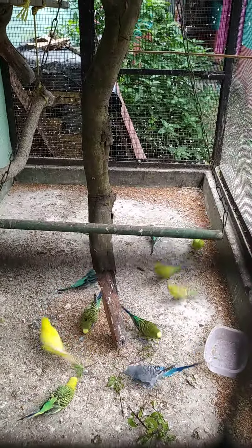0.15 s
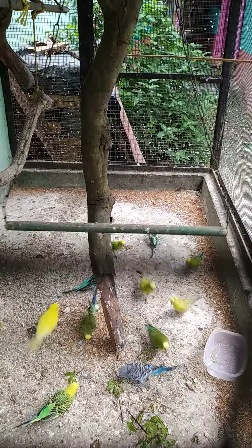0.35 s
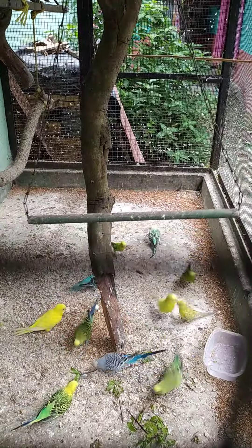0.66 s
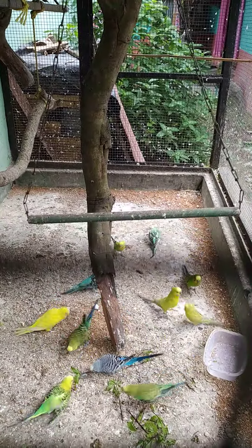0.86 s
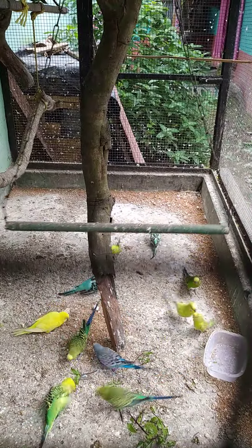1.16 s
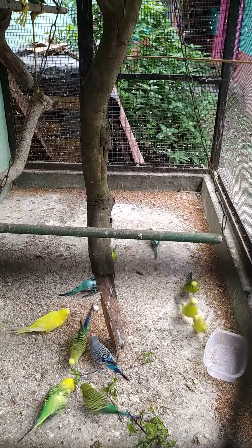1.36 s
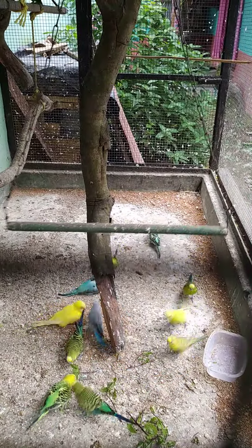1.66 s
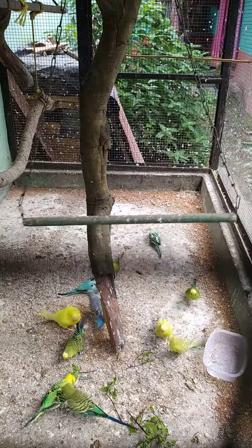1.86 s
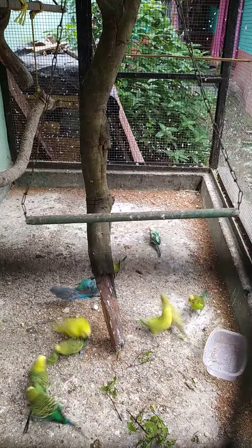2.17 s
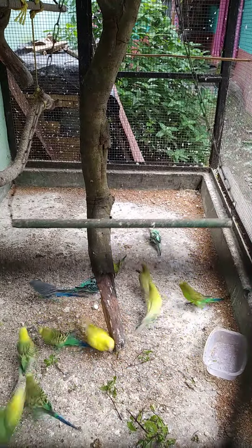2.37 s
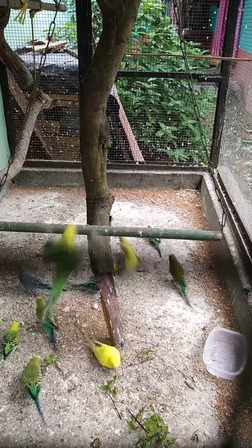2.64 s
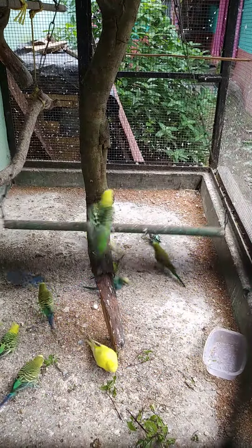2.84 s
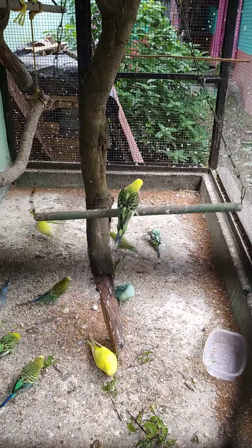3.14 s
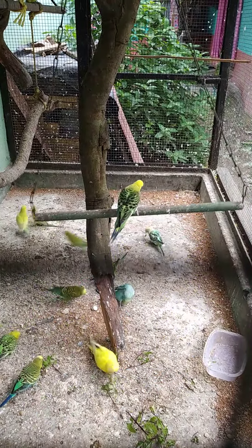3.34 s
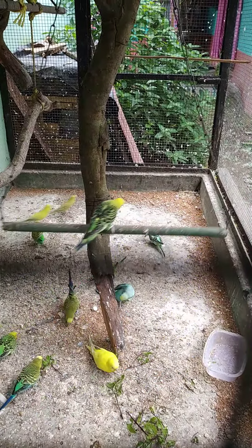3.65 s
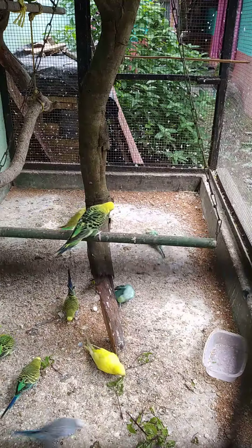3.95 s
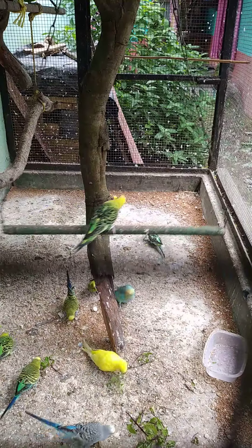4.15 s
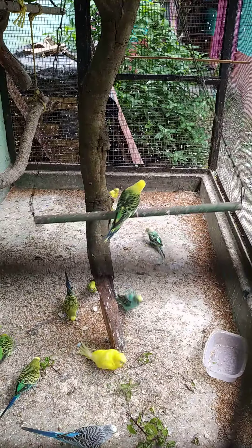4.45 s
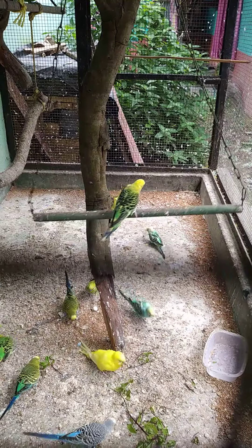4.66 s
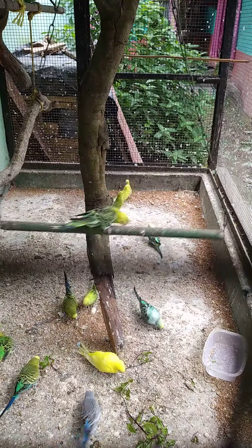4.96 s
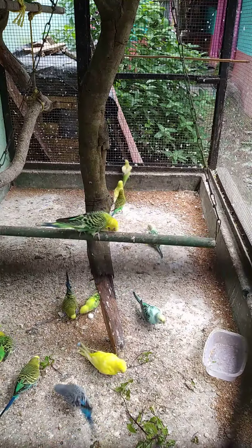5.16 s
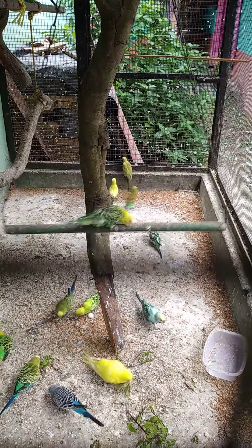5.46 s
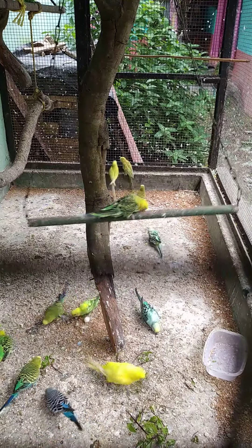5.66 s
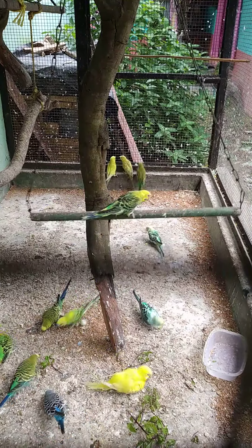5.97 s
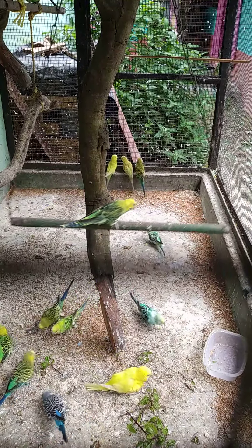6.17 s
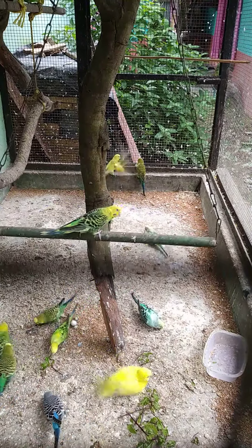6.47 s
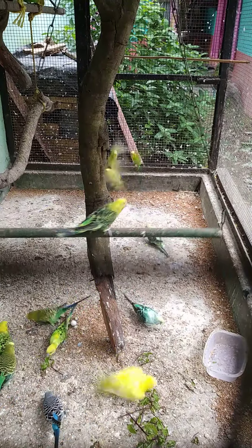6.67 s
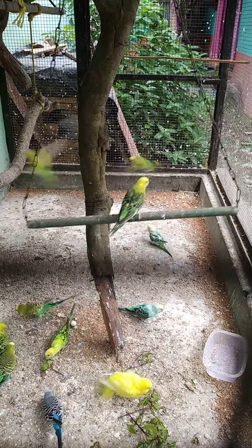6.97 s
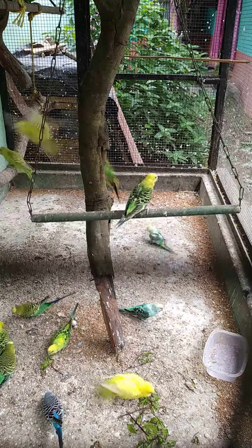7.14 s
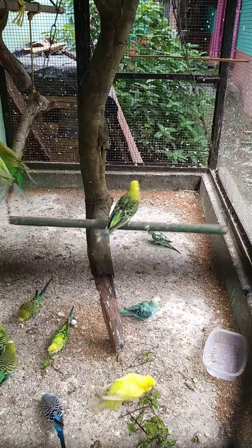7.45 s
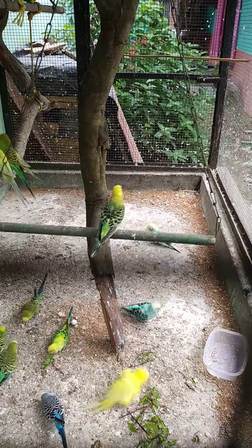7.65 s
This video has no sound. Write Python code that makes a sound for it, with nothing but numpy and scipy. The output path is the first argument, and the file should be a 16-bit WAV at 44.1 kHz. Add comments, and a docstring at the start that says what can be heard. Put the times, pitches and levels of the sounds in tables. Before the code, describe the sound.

Budgerigars chirp and flutter in an outdoor aviary, and one breaks into a run of shrill, rasping squawks over a faint hush.

```python
"""An outdoor aviary, where a flock of budgerigars feeds on the floor.
A vibrating membrane in each bird's voice box makes gliding chirps and short reedy chips; one bird
scolds in shrill, rasping squawks that ring its throat. Wings whirr as they push the air, beaks tick
on the concrete, and floor and walls throw every call back. Behind it all are a steady hush,
a low draught, birds warbling further off and two faint, thin tones."""
import sys
import numpy as np
from scipy import signal
from scipy.fft import rfft, irfft
from scipy.io import wavfile
from scipy.ndimage import uniform_filter1d

SR = 44100
rng = np.random.default_rng(int(sys.argv[2]) if len(sys.argv) > 2 else 0)


def transcribe(u):
    """Save the signal u as a 16-bit wav file named by the first command-line argument.

    u: samples, shape (n,) or (channels, n), limited to [-1, 1]; the rate is SR.
    q: integer samples, one column per channel.
    """
    v = np.clip(np.atleast_2d(u).T, -1, 1)
    q = np.round(v * 32767).astype(np.int16)
    wavfile.write(sys.argv[1], SR, q)


N = 344421


def amp(db):
    return 10 ** (np.asarray(db) / 20)


def unit_level(x):
    return x / np.sqrt(np.mean(x ** 2) + 1e-20)


def curve_at(points, hz):
    """Reads a curve of (Hz, value) points at the given frequencies."""
    point_hz, value = np.transpose(points)
    return np.interp(np.log(hz + 1), np.log(point_hz + 1), value)


def add(mix, start, sound):
    """Mixes a sound in at a start time in seconds."""
    part = mix[..., max(round(start * SR), 0):][..., :sound.shape[-1]]
    part += sound[..., :part.shape[-1]]


def coloured(x, spectrum):
    """Filters x by a curve of (Hz, dB) points and brings it to level 1."""
    n = x.shape[-1]
    return unit_level(irfft(rfft(x) * amp(curve_at(spectrum, np.fft.rfftfreq(n, 1 / SR))), n))


def wobble(n, hz):
    """Smooth random motion, mostly slower than hz."""
    padded = n + SR // 8
    lowpass = 1 + (np.fft.rfftfreq(padded, 1 / SR) / hz) ** 4
    return unit_level(irfft(rfft(rng.standard_normal(padded)) / lowpass))[:n]


def gate(t, length, rise, fall):
    """Opens over rise seconds and shuts around the given length."""
    fade_in = np.sin(np.pi / 2 * np.clip(t / rise, 0, 1))
    fade_out = np.sin(np.pi / 2 * np.clip((length - t) / fall + .5, 0, 1)) ** 2
    return fade_in * fade_out


def voice_box(hz, rough, overtones_db, flutter_hz=600, throat_hz=8200, throat_width_hz=1700):
    """A membrane vibrates; roughness shakes its pitch and strength, and the throat favours high tones."""
    # Each row: frequency in Hz, boost in dB for an overtone there.
    overtone_curve = [(1000, -45), (2200, 8.5), (3300, 2), (4700, 3.5), (6200, 1), (8300, -5), (9700, 0),
                      (11000, -12), (14000, -13.5)]
    pitch = hz * np.exp(.16 * rough * wobble(len(hz), flutter_hz))
    phase = 2 * np.pi * np.cumsum(pitch) / SR
    voice = np.sin(phase)
    for k in range(2, 12):
        resonance = np.exp(-((k * hz - throat_hz) / throat_width_hz) ** 2)
        throat_db = .9 * max(overtones_db, 6) * (resonance - .9)
        strength = amp(overtones_db + throat_db + curve_at(overtone_curve, k * hz))
        voice += strength * (k * pitch < SR / 2) * np.sin(k * phase)
    return unit_level(voice * np.exp(rough * wobble(len(hz), flutter_hz)))


def aviary(x, near_db, far_db, moved=0., near_decay_s=0.13, far_decay_s=0.7):
    """Adds hard echoes that shift with the bird's place, a quick scatter in the cage and a longer tail."""
    # Each row: delay in seconds, left gain, right gain.
    echoes = [(.0011, 1, -0.15), (.0024, -0.099, 0.51), (.0049, 0.89, 0.38), (.0066, 0.21, 0.46),
              (.0092, -0.039, -0.86)]
    t = np.arange(SR // 2) / SR
    response = np.zeros((2, len(t)))
    response[0, 20] = response[1, 0] = 1  # the direct sound reaches the right side first
    for delay, left, right in echoes:
        response[:, round(delay * np.exp(moved * rng.uniform(-1, 1)) * SR)] += left, right
    for db, decay_s, build_s in ((near_db, near_decay_s, .004), (far_db, far_decay_s, .02)):
        bounces = rng.choice([-1., 1.], response.shape) * (rng.random(response.shape) < .15)
        tail = bounces * amp(-60 * t / decay_s) * np.minimum(t / build_s, 1)
        response += amp(db) * tail / np.linalg.norm(tail, axis=1, keepdims=True)
    echoing = signal.fftconvolve(x[None], response, axes=1)
    return echoing * np.linalg.norm(x) / np.linalg.norm(echoing, axis=1, keepdims=True)


def air(hush_db=-64):
    """A steady outdoor hush, alike on both sides in the bass, and a low draught on the microphones."""
    # Each row: frequency in Hz, relative level of the hush in dB.
    hush_colour = [(20, 1), (45, 0.5), (110, -3), (220, -6.5), (450, -15), (1200, -14.5), (2500, -20.5),
                   (5000, -19), (7000, -24), (9500, -13), (11500, -24), (14000, -26.5)]
    # Each row: frequency in Hz, how alike left and right are (1 the same, 0 unrelated).
    likeness = [(50, 0.7), (200, 0.93), (500, 0.82), (1200, -0.13), (4000, 0), (12000, 0)]
    # Each row: time in seconds, level of the draught in dB.
    draught_levels = [(0, -77), (2.2, -76.5), (2.498, -69.5), (4.699, -68.5), (5.85, -71), (6.1, -58.5),
                      (6.6, -65), (7.22, -58.5), (7.4, -67.5), (7.8, -73)]
    left, unrelated, buffeting = rng.standard_normal((3, N))
    alike = curve_at(likeness, np.fft.rfftfreq(N, 1 / SR))
    right = irfft(alike * rfft(left) + np.sqrt(1 - alike ** 2) * rfft(unrelated), N)
    hush = amp(hush_db + .4 * wobble(N, 3)) * coloured(np.array([left, right]), hush_colour)
    times, db = np.transpose(draught_levels)
    draught = coloured(buffeting, [(15, -0.5), (35, 0.5), (110, -8), (250, -31.5), (1000, -76)])
    return hush + draught * amp(np.interp(np.arange(N) / SR, times, db))


def chirps(swell_db=7, fade_db=10.5, quaver_db=2.0, warble_octaves=.12, warble_hz=65, nearby_db=-48):
    """Whistles glide along an arch, swell and fade; faint ones come from further off, with more echo."""
    # Each row: start and length in seconds, first and last pitch in Hz, arch in octaves, level in dB,
    # loudest point as a share of the length, roughness from 0 to 1, overtone boost in dB.
    notes = [(0, 0.048, 4860, 3610, 0.093, -45.5, 1, .42, -1.5),
             (0.054, 0.068, 2250, 2530, 0.18, -48, .3, 0.21, -3),
             (0.08, 0.051, 4750, 3920, -0.18, -41.5, 0.96, 0.45, -17),
             (0.102, .05, 3077, 2023, -.08, -38, 0.11, 0.52, -9.5),
             (0.193, .03, 2646, 2883, -.12, -40, 0.69, 0.16, -13.5),
             (0.226, 0.016, 2620, 3660, 0.024, -40, 0.59, 0.25, -15),
             (0.76, 0.04, 3240, 2860, 0.29, -49, 0.79, 0.22, -2.5),
             (0.79, .115, 3550, 1480, -0.079, -51.5, 0.045, 0.42, -11.5),
             (0.987, 0.051, 5570, 3945, -0.19, -46.5, 0.64, 0.21, -4),
             (1.054, 0.062, 2500, 1635, 0.17, -53.5, 0.69, 0.28, -12),
             (1.318, 0.26, 971, 995, 0.056, -62, 0.79, .15, -11),
             (2.012, 0.082, 1456, 1537, -0.17, -58.5, .35, 0.13, -7),
             (2.149, 0.064, 3760, 3900, -0.053, -50, 0.084, 0.27, 0),
             (2.226, 0.047, 3060, 3680, 0.092, -41, 0.33, 0.54, -5),
             (2.258, 0.06, 2306, 2386, 0.18, -39.5, 0.54, 0.23, -7.5),
             (2.295, 0.065, 3480, 2976, -0.012, -38, 0.19, .5, -7.5),
             (2.421, 0.054, 2530, 3360, 0.19, -48.5, .5, 0.44, -3),
             (2.482, 0.054, 3130, 2680, 0.47, -47.5, 0.49, 0.26, -7),
             (2.797, 0.049, 1760, 2354, -0.11, -49, 0.53, 0.15, -8),
             (2.839, 0.12, 2235, 2166, .24, -45.5, 0.3, 0.07, -9),
             (2.949, 0.033, 2160, 2000, -0.1, -34.5, 0.92, 0.18, 27),
             (2.972, 0.054, 2076, 1618, 0.26, -40, 0.91, 0.19, 24.5),
             (3.1, 0.045, 1224, 1088, 0.0028, -55, 0.27, 0.38, -12.5),
             (3.228, 0.15, 1046, 1130, 0.12, -63.5, 0.19, 0.73, -13),
             (3.411, 0.044, 2400, 1810, 0.015, -56, 0.36, 0.42, -15),
             (3.463, 0.073, 2330, 1778, 0.11, -51, 0.32, 0.15, 4.5),
             (4.272, 0.062, 3070, 1690, 0, -59, 0.97, 0.24, -14),
             (4.374, 0.067, 1534, 1087, -0.13, -57.5, 0.85, 0.3, -7),
             (4.746, 0.09, 3116, 2680, -.14, -46.5, 0.073, 0.19, 0),
             (5.016, .035, 3730, 3680, 0, -38, 0.47, 0.12, -16),
             (5.056, 0.018, 2280, 2200, -0.073, -52, .5, 0.25, -29),
             (6.413, 0.034, 3460, 3670, -0.031, -48, .5, 0.42, -12),
             (6.444, 0.02, 1925, 1930, 0.018, -54, .45, 0.16, -15),
             (6.468, 0.07, 4020, 1876, -0.18, -42.5, 0.059, 0.57, -5),
             (6.494, 0.024, 4780, 3780, -0.089, -40, 0.59, .35, -1),
             (6.528, 0.022, 4050, 4060, 0.0016, -37, 0.54, 0.19, -4),
             (6.555, .075, 3210, 3790, -0.078, -33.5, 0.91, .3, -11),
             (7.251, .048, 5140, 4380, -0.23, -32.5, .3, 0.6, 6),
             (7.274, .022, 3010, 2993, 0.015, -31, 0.41, 0.04, -14),
             (7.302, .04, 4100, 3500, .04, -27, 0.12, .2, -6.5),
             (7.315, 0.12, 2400, 2275, -0.024, -43, 0.098, 0.6, 1.5),
             (7.344, 0.025, 2983, 3075, 0.054, -28, 0.43, 0.12, -20),
             (7.372, 0.054, 3124, 3425, .07, -29, 0.46, .26, -17.5),
             (7.428, 0.084, 3440, 2290, 0.048, -46, 0.1, .33, -4.5)]
    out = np.zeros((2, N))
    for start, length, first_hz, last_hz, arch, db, crest, rough, overtones_db in notes:
        t = np.arange(0, length + 0.0028, 1 / SR)
        progress = np.minimum(t / length, 1)
        bend = arch * (1 - (2 * progress - 1) ** 2) + warble_octaves * rough * wobble(len(t), warble_hz)
        pitch = first_hz * (last_hz / first_hz) ** progress * 2 ** bend
        effort_db = db - np.interp(progress, [0, crest, 1], [swell_db, 0, fade_db])
        level = amp(effort_db + quaver_db * wobble(len(t), 84)) * gate(t, length, 0.00035, 0.0017)
        voice = level * voice_box(pitch, rough, overtones_db)
        distance_db = 0.94 * max(nearby_db - db, 0)
        add(out, start, aviary(voice, near_db=distance_db - 7, far_db=distance_db - 16, moved=.3))
    return out


def squawks(pulse_hz=168, jitter=.14, leak=.35, hiss_db=-3, ring_db=4, close_s=0.035):
    """Uneven pulses of whistle and hiss ring the throat, whose pitch arches as the beak opens."""
    # Each row: start and length in seconds, level in dB, throat resonance in Hz,
    # treble lift in dB per half octave above that resonance, swell time in seconds.
    calls = [(0.097, 0.027, -44, 8400, 3, 0.009), (1.641, 0.015, -35.5, 9090, 3, 0.0065),
             (2.218, 0.035, -43, 8760, 7, 0.011), (2.325, 0.035, -42, 8900, 7, 0.0093),
             (4.431, 0.03, -26.5, 8600, 3, 0.021), (4.503, 0.072, -30, 7750, 3.5, 0.033),
             (4.613, 0.087, -29, 7400, 2.5, 0.072), (4.803, 0.0517, -17.5, 7530, 6.5, 0.025),
             (4.921, 0.062, -16, 8030, 9.5, 0.023), (5.058, 0.073, -17.5, 7235, 5.5, 0.022),
             (5.217, 0.09, -18.5, 7190, 6, 0.021), (5.385, .082, -19.5, 7460, 5.5, 0.028),
             (5.542, .089, -17.5, 7184, 6, 0.037), (5.714, .081, -19.5, 7490, 5.5, 0.017),
             (5.872, .081, -20.5, 7290, 6.5, 0.028), (6.023, 0.068, -25, 7780, 6, .055),
             (6.091, 0.051, -30.5, 7170, 5.5, .02), (6.247, .085, -23.5, 7390, 7, .03),
             (6.586, .039, -30, 8680, 6, 0.009), (6.691, 0.026, -25.5, 7630, 3.5, 0.014)]
    # Each row: frequency in Hz, boost of the rasp in dB.
    rasp_colour = [(500, -26), (1200, -27.5), (2400, -11), (3000, -8), (3650, -6), (4200, -0.5),
                   (4600, -7.5), (5000, 0), (5500, 5), (7200, 4.5), (9200, 2.5), (11000, -8), (14000, -22)]
    out = np.zeros((2, N))
    hz = np.geomspace(400, SR / 2, num=200)
    hollow_db = -11 * np.exp(-((hz - 3180) / 230) ** 2)  # a narrow dip that makes the rasp sound hollow
    for start, length, db, throat_hz, treble_db, swell_s in calls:
        t = np.arange(0, length + close_s, 1 / SR)
        n = len(t)
        cycle = np.cumsum(pulse_hz * np.exp(jitter * wobble(n, 306))) / SR % 1
        puffs = np.exp(-cycle / 0.43) * np.minimum(cycle / 0.085, 1)
        pulses = (puffs + leak) * amp(1.4 * wobble(n, 200))
        opening = np.sin(np.pi * t / t[-1])
        # The pitch rises with the beak, falls within each pulse and wanders a little.
        ring_hz = throat_hz * (1 + .11 * (opening - .85) + .14 * (.35 - cycle) + 0.0427 * wobble(n, 870))
        phase = np.pi * np.cumsum(ring_hz) / SR  # the membrane swings an octave under the throat
        whistle = sum(gain * np.sin(k * phase) for k, gain in enumerate([0.68, 1, 0.96, 1.07], 1))
        octaves = np.log2(hz / throat_hz)
        colour_db = curve_at(rasp_colour, hz) + 2 * treble_db * np.maximum(octaves, 0) + hollow_db
        throat_db = ring_db * np.exp(-(octaves / .09) ** 2)
        rasp = coloured(pulses * whistle, np.c_[hz, colour_db + throat_db])
        hiss = amp(hiss_db) * coloured(pulses * rng.standard_normal(n), np.c_[hz, colour_db])
        call = amp(db) * unit_level(rasp + hiss) * gate(t, length, swell_s, min(close_s, length / 2))
        add(out, start, aviary(call, near_db=4.5, far_db=-14.5, moved=.01))
    return out


def pecking(decay_s=0.0014, husk_db=-60, husk_count=60):
    """Beaks and claws tick on the concrete close by, and seed husks crack faintly at random."""
    # Each row: start in seconds, strength of the tick in dB.
    ticks = [(.381, -60), (.395, -56), (0.536, -51.5), (1.381, -57), (2.119, -52), (3.139, -46),
             (3.262, -49), (3.351, -50), (3.554, -52), (6.212, -56), (7.643, -52)]
    # Each row: frequency in Hz, relative level of a click in dB.
    click_colour = [(400, -10), (1500, -9), (5000, -11), (9500, 1.5), (14000, -14)]
    taps, t = np.zeros(N), np.arange(SR // 50) / SR
    husks = [(when * N / SR, husk_db + 8 * (force - .5)) for when, force in rng.random((husk_count, 2))]
    for start, db in ticks + husks:
        click = coloured(rng.standard_normal(len(t)), click_colour) * np.exp(-t / decay_s)
        add(taps, start, amp(db) * click)
    return taps + 0.74 * aviary(taps, near_db=-9, far_db=-32.5)[:, :N]


def distant_flock(count=420):
    """Birds further off warble in spells: short soft glides, blurred by echoes."""
    # Each row: middle of a spell and half its length in seconds, level in dB.
    spells = [(1.137, 0.18, -60.5), (1.685, 0.14, -60.5), (2.694, 0.63, -68.5), (4.114, 0.11, -67.5),
              (4.607, 0.55, -63), (5.6, 0.52, -61), (6.17, 0.12, -61), (7.317, 0.17, -74)]
    out = np.zeros((2, N))
    for when, length, height, glide, size, side in rng.random((count, 6)):
        t = np.arange(0, .03 + 0.079 * length, 1 / SR)
        hz = (1450 + 1050 * height) * np.exp(.5 * (glide - .6) * t / t[-1])
        note = voice_box(hz, rough=.35, overtones_db=-16) * np.hanning(len(t)) * amp(7.8 * size)
        add(out, when * N / SR, note * np.array([[side], [1 - side]]))
    blurred = unit_level(sum(aviary(part, near_db=-8, far_db=0, moved=.2)[:, :N] for part in out))
    t = np.arange(N) / SR
    return blurred * sum(amp(db) * np.exp(-((t - middle) / half) ** 2) for middle, half, db in spells)


def chips():
    """Very short notes from the voice box, reedy because their overtones are strong."""
    # Each row: start and length in seconds, first and last pitch in Hz, level in dB,
    # roughness (0 is smooth), overtone boost in dB.
    notes = [(1.447, 0.016, 2420, 2450, -49, 0.3, 4.5), (1.51, 0.017, 3120, 2930, -43, 0.65, 7),
             (1.577, 0.019, 2920, 3190, -31, 0.62, 19.5), (1.775, 0.029, 2097, 2390, -43, 0.65, 8),
             (1.798, 0.041, 1103, 1034, -46.5, 0, 21), (1.85, 0.014, 2070, 2530, -44.5, 0.27, 5.5),
             (1.914, 0.008, 2520, 2830, -44.5, 0.5, 12), (1.978, 0.021, 2280, 2636, -44, 0.1, 7.5),
             (2.14, 0.033, 2960, 2680, -50, 0.4, 14), (2.191, 0.03, 3140, 2900, -42.5, 0.56, 11),
             (4.098, 0.032, 2794, 2650, -50.5, 0.72, 13.5), (4.197, 0.014, 2610, 2720, -50.5, 0.7, 10),
             (7.181, 0.012, 2880, 3280, -26.5, 0.5, 16.5), (7.514, 0.015, 2100, 2210, -44, 0.93, 13),
             (7.543, 0.013, 2800, 3000, -40, 0.34, 11), (7.655, 0.02, 3060, 2940, -44, 1.1, 17)]
    out = np.zeros((2, N))
    for start, length, first_hz, last_hz, db, rough, overtones_db in notes:
        t = np.arange(0, length + 0.0023, 1 / SR)
        pitch = first_hz + (last_hz - first_hz) * np.sin(np.pi / 2 * t / length)
        note = amp(db) * voice_box(pitch, rough, overtones_db) * gate(t, length, 0.00058, 0.0021)
        add(out, start, aviary(note, near_db=-2, far_db=-13, moved=.3))
    return out


def wings(puff_db=-4, cage_hz=484, cage_width_hz=35, cage_db=-14):
    """Each downstroke pushes a puff of air, rustles the feathers and sets the cage humming."""
    # Each row: start and length in seconds, base level in dB, beats a second,
    # pitch of the puff in Hz, rustle in dB above the base level.
    flights = [(2.389, 0.2, -57.5, 25.6, 400, 2.5), (2.49, 0.039, -59, 17, 450, -6),
               (2.53, .27, -63, 19, 476, 7), (2.721, .9, -75.5, 26, 435, 13),
               (3.5, 1.42, -68.5, 19.8, 407, 2), (5.949, 0.84, -62, 23.3, 386, 5),
               (6.6, .6, -59, 28.7, 260, 1), (7.101, .23, -61, 20, 381, 5.5)]
    # Each row: frequency in Hz, relative level of the rustle in dB.
    feather_colour = [(30, -43), (200, -2), (600, -2.5), (1500, -8.5), (5000, -9), (9500, 0),
                      (14000, -12.5)]
    out = np.zeros((2, N))
    cage = signal.iirpeak(cage_hz, cage_hz / cage_width_hz, fs=SR)
    for start, length, db, beat_hz, puff_hz, rustle_db in flights:
        t = np.arange(0, length, 1 / SR)
        beats = np.cumsum(beat_hz * (1 + 0.23 * wobble(len(t), 10.9))) / SR
        strokes = unit_level(np.exp(.7 * np.sin(2 * np.pi * beats)))
        level = amp(db) * strokes * np.sqrt(np.sin(np.pi * t / length).clip(0))
        puff_colour = [(30, -14), (puff_hz / 3, -3), (puff_hz, 0), (puff_hz * 2, -15), (puff_hz * 10, -40)]
        puffs, feathers = rng.standard_normal((2, len(t)))
        wide_puffs = puffs + .5 * rng.standard_normal((2, len(t)))
        add(out, start, amp(puff_db) * level * coloured(wide_puffs, puff_colour))
        rustle = amp(rustle_db) * level * coloured(feathers, feather_colour)
        add(out, start, aviary(rustle, near_db=16, far_db=6, moved=0.05))
        hum = signal.lfilter(*cage, np.pad(level * puffs, (0, SR // 8)))
        add(out, start, amp(db + cage_db) * unit_level(hum))
    return out


def distant_tones(waver=0.0049):
    """Thin, nearly steady tones drift in from far off."""
    # Each row: start and length in seconds, pitch in Hz, level in dB.
    tones = [(3.203, 1.1, 1095, -87), (6.546, 1.6, 1260, -84)]
    out = np.zeros((2, N))
    for start, length, hz, db in tones:
        t = np.arange(0, length, 1 / SR)
        tone = np.sin(2 * np.pi * np.cumsum(hz * (1 + waver * wobble(len(t), 20))) / SR)
        swell = np.sqrt(np.sin(np.pi * t / length).clip(0))
        add(out, start, amp(db) * unit_level(tone * swell))
    return out


def scene():
    """The birds and the outdoor background, mixed in stereo."""
    birds = pecking() + chirps() + chips() + squawks() + distant_flock() + wings()
    return birds + distant_tones() + air()


def record(dry, threshold_db=-33, squeeze=0.17, recover_db_per_s=8, thump_hz=15, top_hz=14300):
    """Two microphones colour the treble; loud calls turn the gain down and distort into a faint thump."""
    # Each row: frequency in Hz, how many dB louder the left microphone opening is than the right.
    balance = [(1000, 0.5), (4000, -0.5), (5200, -0.5), (6500, -1.5), (7900, -2), (8900, 7), (10000, 7),
               (12000, 7.5), (14000, 10)]
    tilt_db = curve_at(balance, np.fft.rfftfreq(N, 1 / SR)) / 2
    heard = irfft(rfft(dry) * amp([tilt_db, -tilt_db]), N)
    power = uniform_filter1d((heard ** 2).mean(0), size=1400)
    power_db = 10 * np.log10(abs(power) + 1e-12)
    recovery = np.arange(N) / SR * recover_db_per_s
    held_db = np.maximum.accumulate(power_db + recovery) - recovery  # jumps up, sinks slowly
    heard = heard * amp(-squeeze * np.maximum(held_db - threshold_db, 0))
    thump = signal.sosfilt(signal.butter(2, [4, thump_hz], "band", fs=SR, output="sos"), heard ** 2)
    heard = heard - thump * np.array([[1], [.4]])
    lowpass = signal.firwin(401, top_hz, window=("kaiser", 7), fs=SR)
    return signal.oaconvolve(heard, lowpass[None], "same")


dry = scene()
out = record(dry)
transcribe(out)
```